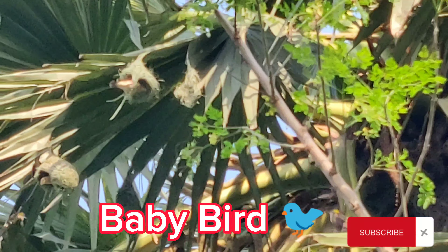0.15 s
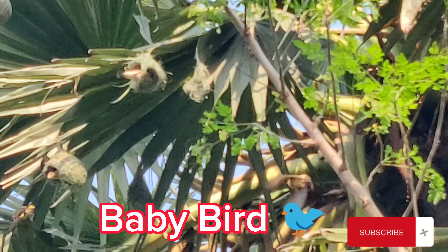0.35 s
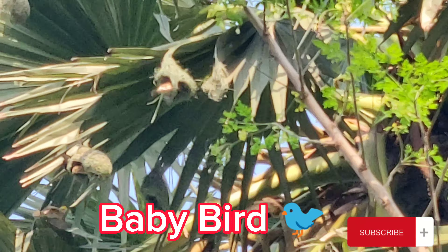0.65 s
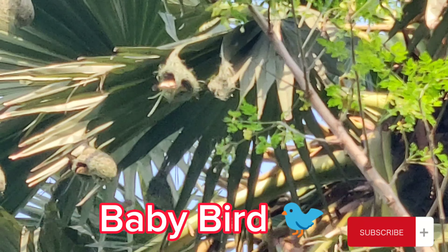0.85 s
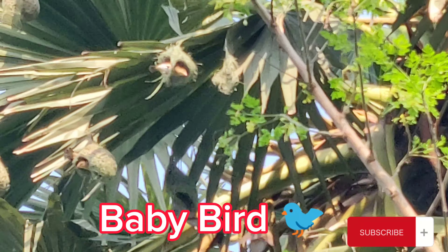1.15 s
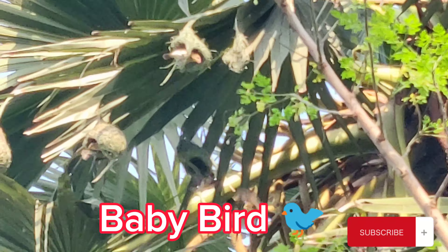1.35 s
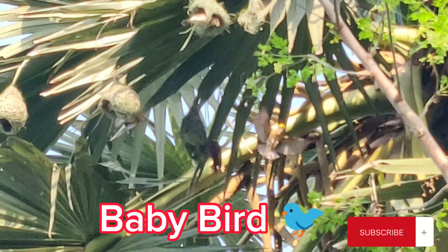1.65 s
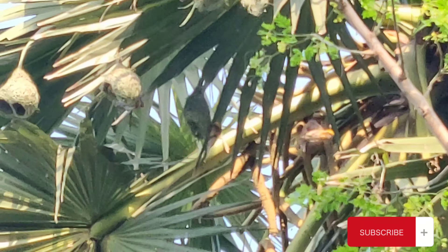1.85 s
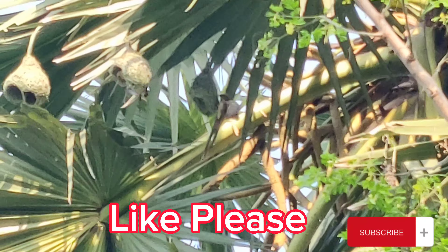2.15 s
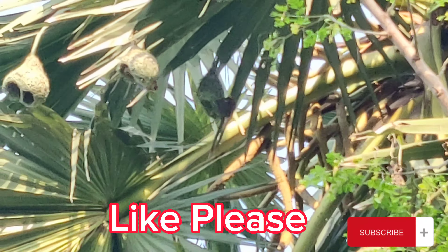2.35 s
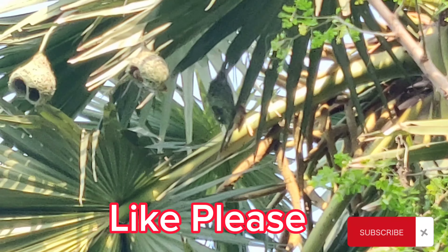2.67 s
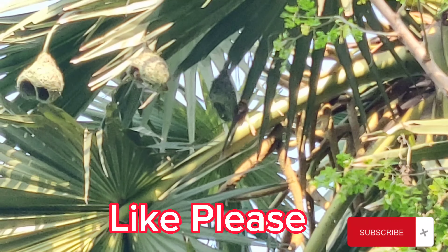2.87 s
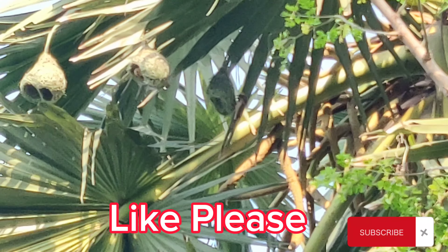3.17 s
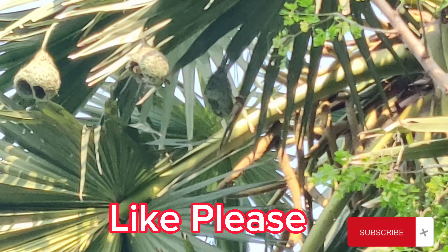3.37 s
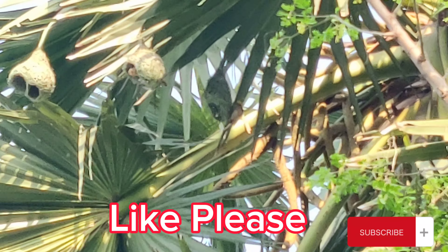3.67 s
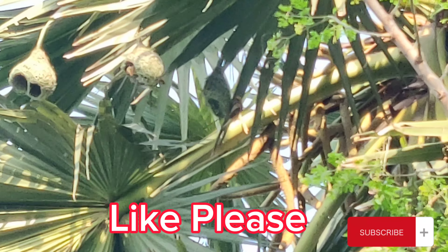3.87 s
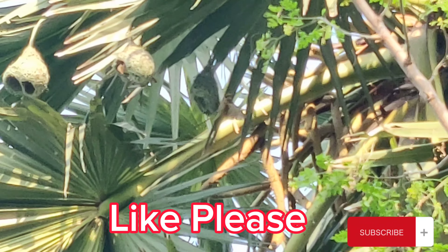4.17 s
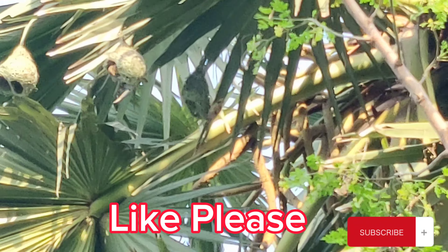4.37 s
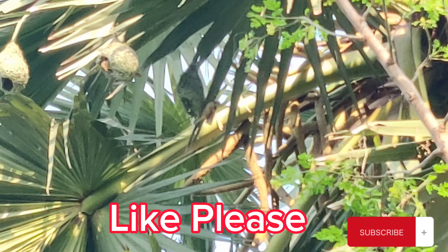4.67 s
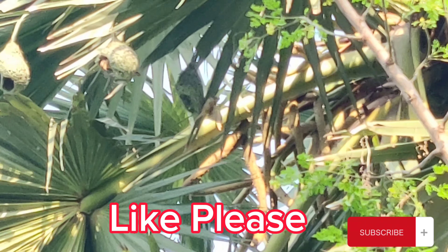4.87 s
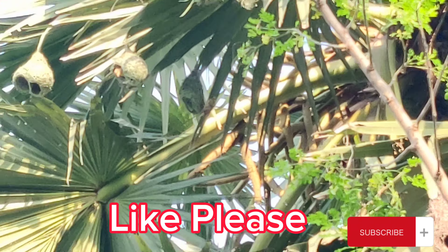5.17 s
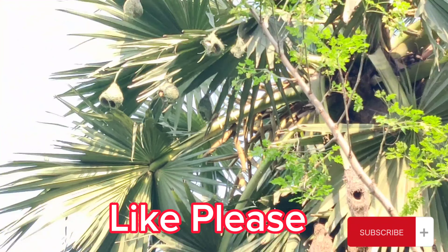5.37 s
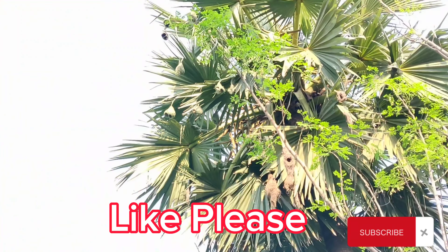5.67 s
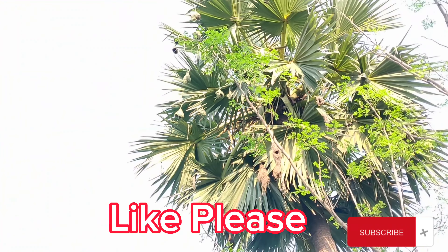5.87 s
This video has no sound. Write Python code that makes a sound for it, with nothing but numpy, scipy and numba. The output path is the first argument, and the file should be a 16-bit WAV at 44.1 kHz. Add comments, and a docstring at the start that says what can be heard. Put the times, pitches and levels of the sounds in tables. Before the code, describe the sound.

A colony of weaver birds chatters in raspy bursts with sharp chirps and a long wheezing buzz, over low outdoor rumble and distant cooing.

```python
"""A weaver colony in a fan palm, over a low outdoor rumble with a bird cooing far off from the start.
Rasping chatter, two sides of a syrinx pulsing through throat resonances, soon gains sharp gliding chirps.
Soft filtered-noise knocks begin close to the microphone, then come a thin sliding whistle and a long wheezing
buzz, a pulsed high tone over a lower one. Two pairs of squeaky clicks follow, tone plus hiss, as the calls thin out.
The stiff fronds scatter every call."""
import sys
import numpy as np
from scipy import signal
from scipy.fft import rfft, irfft, next_fast_len
from scipy.io import wavfile
from numba import njit

SR = 44100
rng = np.random.default_rng(int(sys.argv[2]) if len(sys.argv) > 2 else 0)


def generate_wav(sig):
    """Save sig (samples, or channels by samples) to the path in sys.argv[1] as 16-bit PCM at SR."""
    pcm = np.round(np.clip(np.atleast_2d(sig).T, -1, 1) * 32767).astype(np.int16)
    wavfile.write(sys.argv[1], SR, pcm)


N = 265482
TIME = np.arange(N) / SR  # seconds
LEFT_LAG = 7  # samples by which the palm's sound reaches the left ear late
TOP_HZ = 15500

# Outdoor air spectrum. Each row: frequency in Hz, relative density in dB per Hz.
AIR_SPECTRUM = [(15, -36.5), (25, 0.5), (75, -3), (140, -14), (389, -22.5), (582, -25.5), (722, -28),
                (1410, -34.5), (2920, -36.5), (3630, -36), (4750, -34), (6050, -34.5), (7500, -30),
                (9810, -51.5), (15500, -44.5)]
AIR_DB, AIR_WANDER_DB = -49, 0.8
MURMUR_DB, MURMUR_DB_PER_S, MURMUR_WANDER_DB = -60.5, -1.32, 0.7  # the low murmur slowly fades

# Soft knocks. Each row: start in seconds, level in dB before the knock gain, upper edge in Hz,
# left minus right in dB.
KNOCKS = [(1.823, -37.5, 806, 19), (1.851, -31.5, 1500, 23), (1.914, -36.5, 694, 29),
          (2.185, -41.5, 890, 16), (2.683, -47.5, 605, 18), (3.401, -41, 610, 23), (3.569, -39.5, 880, 0.5),
          (4.047, -42.5, 483, 29), (4.368, -37.5, 1040, 0)]
KNOCK_GAIN_DB = 8.5
KNOCK_DECAY_S, KNOCK_EDGE_HZ = 0.0062, 1020  # scrape decay at this edge; brighter ones die faster

# Distant coos. Each row: start in seconds, length in seconds, top pitch in Hz, level in dB.
COOS = [(0.085, 0.227, 757, -49.5), (0.04, 0.5, 636, -55.5), (1.156, 0.65, 621, -57),
        (1.237, 0.35, 696, -60), (2.081, 0.6, 628.7, -54.5), (2.164, 0.22, 711, -55.5),
        (2.939, 0.5, 625, -55), (3.09, 0.34, 702, -59)]
# Pitch arch of a coo. Each entry: pitch as a share of the top, at the start, the top and the end.
COO_ARCH = [0.94, 1, 0.925]

# Squeaky clicks. Each row: start in seconds, length in seconds, start pitch in Hz, end pitch in Hz, level in dB.
SQUEAKS = [(3.567, 0.0039, 1195, 1810, -25.5), (3.586, 0.015, 1400, 1225, -31),
           (4.3723, 0.0073, 1410, 1860, -24), (4.419, 0.015, 1346, 1243, -29.5)]
# Overtones of a squeak, from the second harmonic up. Each entry: level in dB re the fundamental.
SQUEAK_OVERTONES = [-7.5, -8.5, -8, -8, -28, -50]
# Hiss spectrum of a squeak. Each row: frequency in Hz, response in dB.
SQUEAK_HISS = [(1000, -15.5), (3000, -12), (6800, 2), (8500, -2.5), (10500, -36), (15000, -35)]
SQUEAK_BRIGHT_DB, SQUEAK_HISS_DB = 0, 0.5  # overtone and hiss gains

# Slurred whistled notes. Each row: start in seconds, length in seconds, start pitch in Hz, end pitch in Hz,
# level in dB, opening accent in dB.
WHISTLES = [(2.003, 0.017, 3260, 3280, -35, 2), (2.022, 0.12, 3462, 3412, -37.5, 17),
            (2.13, 0.195, 3462, 3608, -39, 1.5), (2.331, 0.115, 3250, 3496, -36, 8.5)]
WHISTLE_ATTACK_S, WHISTLE_RELEASE_S, ACCENT_S = 0.006, 0.007, 0.039
WHISTLE_PAN_DB = -15.5  # left minus right

# Sharp falling pips of a bird on the left. Each row: start in seconds, middle pitch in Hz,
# level in dB before the chirp gain.
PIPS = [(0.954, 5600, -28), (1.134, 5750, -15.5), (1.144, 5760, -21), (1.164, 6330, -16),
        (1.269, 5550, -18.5), (1.409, 5530, -16.5), (1.566, 5675, -17.5), (1.59, 5870, -18),
        (1.726, 5610, -15.5), (1.861, 5370, -20), (2.066, 5400, -28.5), (2.222, 5330, -26),
        (2.442, 5300, -25)]
PIP_S, PIP_FALL, PIP_PAN_DB = 0.0078, 0.08, 10  # length, fall as a share of the pitch, left minus right
# Longer chirps of the other birds. Each row: start in seconds, length in seconds, start pitch in Hz,
# end pitch in Hz, level in dB before the chirp gain, left minus right in dB.
CHIRPS = [ (0.839, 0.054, 4420, 4000, -30.5, -11), (1.05, 0.011, 4300, 3150, -40, -13),
          (1.136, 0.028, 7700, 7270, -24, -6), (1.272, 0.058, 7900, 6340, -24, -4),
          (1.304, 0.036, 3910, 4360, -21, -12), (1.531, 0.04, 6580, 6120, -24.5, 3.5),
          (1.758, 0.024, 4250, 4090, -24, -10), (1.961, 0.047, 3900, 3690, -43, -22),
          (2.568, 0.014, 4630, 2970, -23.5, -7), (2.577, 0.022, 3130, 3060, -24, -11),
          (2.592, 0.055, 5950, 5700, -31.5, 3), (2.776, 0.052, 7700, 7000, -31, -10.5),
          (3.144, 0.088, 1325, 1700, -48, 9), (4.258, 0.038, 6220, 5530, -49.5, 3),
          (5.777, 0.055, 4060, 3420, -50.5, -11), (5.778, 0.068, 7800, 6640, -46.5, -11)]
# Octave level of the chirps: weaker the higher it lies. Each row: octave frequency in Hz,
# level in dB re the fundamental.
CHIRP_OCTAVE = [(8000, -19.5), (11000, -51)]

BUZZ_START_S, BUZZ_LENGTH_S, BUZZ_ATTACK_S, BUZZ_RELEASE_S = 2.61, 0.792, 0.035, 0.012
BUZZ_PULSE_HZ, BUZZ_LOWER_HZ = 234, 4120
BUZZ_UPPER_DB, BUZZ_LOWER_GAIN_DB = -28, 5.5
# Pitch of the upper buzzing voice. Each row: time in seconds, pitch in Hz.
BUZZ_PITCH = [(2.63, 5220), (2.752, 5058), (3.184, 5433), (3.41, 5237)]
# Loudness of the lower buzzing voice. Each row: time in seconds, level in dB before the lower gain.
BUZZ_LOWER_LEVEL = [(2.63, -45), (2.796, -51), (2.82, -43), (2.84, -43), (2.964, -34), (3.326, -41.5),
                    (3.362, -33.5), (3.41, -41)]

# Rasps, some overlapping. Each row: start in seconds, length in seconds, level in dB, swell over the call in dB,
# main resonance in Hz, low resonance in Hz, then the low resonance, the high resonance and the rattle,
# each in dB before its gain in the mix.
RASPS = [ (0.125, 0.028, -56.5, -4, 5900, 3240, 0.5, -1.5, -9.5),
         (0.231, 0.15, -47.5, -0.5, 6310, 3450, -5.5, -2, -16),
         (0.422, 0.096, -38.5, 10.5, 6040, 2720, -8, -12, -33),
         (0.645, 0.021, -53.5, 1, 5870, 3430, 0, 4.5, -18),
         (0.714, 0.1, -33, 6, 5800, 3700, -10, -7.5, -27),
         (0.823, 0.09, -41, 9, 6030, 3200, -0.5, -7.5, -22),
         (0.922, 0.042, -34.5, 6, 5640, 3040, -8.5, -11, -38),
         (1.053, 0.36, -34.5, 2, 5890, 3340, -4.5, -9, -42),
         (1.115, 0.077, -33, 1, 6270, 3970, -2, -5.5, -48), (1.273, 0.042, -33, 5, 6080, 3890, -2, -9, -27),
         (1.51, 0.4, -38.5, -2.5, 5780, 3410, 0, -8, -38),
         (1.545, 0.057, -33, 7.5, 5800, 3750, -10, -8, -29.5),
         (1.821, 0.057, -34.5, 3, 5540, 3400, -11.5, -12, -24.5),
         (1.981, 0.1, -44.5, 4.5, 5700, 3150, 0.5, -5, -25.5),
         (2.157, 0.085, -42, 5, 5680, 3580, -1, -5, -25),
         (2.284, 0.16, -37.5, -2.5, 5900, 3630, -8, -13, -29.5),
         (2.433, 0.091, -32, -0.5, 5880, 3920, -11, -13.5, -33),
         (2.62, 0.1, -32, 6.5, 5780, 3900, -7, -10.5, -34.5),
         (2.723, 0.691, -34.5, -1, 5490, 4040, -6.5, -13, -37.5),
         (3.136, 0.084, -34.5, 5.5, 5470, 4420, -7, -5, -41),
         (3.493, 0.089, -43.5, 1.5, 5400, 3070, 4.5, -9.5, -18),
         (3.864, 0.023, -50, 1.5, 6050, 3580, -0.5, 5.5, -16),
         (4.929, 0.017, -55.5, -3, 5700, 4050, 7, 4, -23),
         (5.077, 0.019, -50.5, -6, 5620, 4160, 3, 5.5, -22),
         (5.202, 0.12, -42.5, -1, 6030, 3580, -5, -10, -30.5),
         (5.52, 0.12, -43, 1, 6400, 3470, -7, -12, -33)]
RASP_ATTACK_S, RASP_RELEASE_S = 0.011, 0.014
RASP_ARCH_DB, RASP_FLUTTER_DB = 2, 1.0  # a rasp bulges in its middle, and is uneven throughout
MAIN_WIDTH_HZ = 2220
# Throat and beak response around the low resonance. Each row: frequency in Hz, response in dB.
THROAT_LOW = [(1200, -35), (2300, -6), (2900, -3), (4600, -7), (5600, -9), (8000, -43.5)]
# Throat and beak response around the main resonance. Each row: frequency in Hz, response in dB.
THROAT_MAIN = [(2500, -24), (4600, 6.5), (6600, 4), (7300, -2), (9000, -30)]
# Throat and beak response of the high resonance. Each row: frequency in Hz, response in dB.
THROAT_HIGH = [(5800, -20), (6900, -5), (7800, -1.5), (8700, -3.5), (9400, -16), (10300, -52),
               (15000, -24.5)]
# Throat response to the low rattle. Each row: frequency in Hz, response in dB.
THROAT_RATTLE = [(900, -22.5), (1450, -3.5), (2000, 3.5), (2700, 6), (3800, -50)]
# Stereo balance of the rasps. Each row: frequency in Hz, left minus right in dB before the overall pan.
RASP_BALANCE = [(60, 2.5), (110, -4.5), (200, -4.5), (380, -2.5), (700, 1), (1290, 6), (2380, -4.5),
                (4400, 1.5), (8120, -7), (15000, 0)]
RASP_PAN_DB = 0.8  # left minus right, on top of the balance


def undb(db):
    """Decibels to gain."""
    return 10 ** (np.asarray(db) / 20)


def unit(x):
    """Scale to rms 1."""
    return x / np.sqrt(np.mean(x ** 2) + 1e-18)


def colour(x, points):
    """Filter by a (Hz, dB) response, drawn straight between its points over log frequency."""
    hz, db = np.transpose(points)
    size = next_fast_len(x.shape[-1] + 2048)
    f = np.maximum(np.arange(size // 2 + 1) * SR / size, 1)
    gain = undb(np.interp(np.log(f), np.log(hz), db))
    return irfft(rfft(x, size) * gain, size)[..., :x.shape[-1]]


def walk(rate):
    """Random wander of rms 1, gliding between this many fresh values a second."""
    return unit(np.interp(TIME * rate, np.arange(N), rng.standard_normal(N)))


def turn(hz):
    """Phase in radians of a moving frequency."""
    return 2 * np.pi * np.cumsum(hz) / SR


def pan(db):
    """Left and right gains of a level difference, at constant power."""
    gains = undb(np.array([[1], [-1]]) * db / 2)
    return gains / np.sqrt(np.mean(gains ** 2, axis=0))


def add(out, s, sound):
    """Mix a sound in at a time in seconds."""
    i = max(int(s * SR), 0)
    out[:, i:i + sound.shape[-1]] += sound[..., :N - i]


def envelope(t, length, attack_s, release_s):
    """Attack, hold and release of one call."""
    return np.clip(t / attack_s, 0, 1) * np.exp(-np.maximum(t - length, 0) / release_s)


def fronds(x, near_db, near_s, tail_db, tail_t60=0.76, lag=LEFT_LAG):
    """Direct sound, quick reflections off the fronds and a tail from the trees around; each ear has its own."""
    t = np.arange(SR // 2) / SR
    # cubing the noise leaves a few strong reflections among many weak ones
    facets = rng.standard_normal((2, len(t))) ** 3 * np.exp(-t / near_s) * (t > 0.0005)
    trees = rng.standard_normal((2, len(t))) * undb(-60 * t / tail_t60) * np.minimum(t / 0.022, 1)
    facets /= np.linalg.norm(facets, axis=1, keepdims=True)
    trees /= np.linalg.norm(trees, axis=1, keepdims=True)
    echo = undb(near_db) * facets + undb(tail_db) * trees
    echo[[0, 1], [lag, 0]] += 1  # direct sound
    echo /= np.linalg.norm(echo, axis=1, keepdims=True)
    return signal.fftconvolve(x * np.ones((2, 1)), echo, axes=1)[:, :N]


def air(side_db=-9.0):
    """Low outdoor rumble, much alike at both ears, under a wide faint hiss of leaves, with a fading murmur."""
    mid = unit(colour(rng.standard_normal(N), AIR_SPECTRUM))
    side = unit(colour(rng.standard_normal(N), AIR_SPECTRUM))
    side = colour(side, [(60, side_db), (700, -5), (3000, -0.5), (9000, -0.5)])
    bed = (mid + side * np.array([[1], [-1]])) * undb(AIR_DB + AIR_WANDER_DB * walk(4.1))
    murmur_response = [(40, -15.0), (150, 0.0), (450, -9.5), (900, -6.0), (2000, -12), (6000, -35.5)]
    murmur = unit(colour(rng.standard_normal((2, N)), murmur_response))
    murmur_db = MURMUR_DB + MURMUR_DB_PER_S * TIME + MURMUR_WANDER_DB * walk(9.5)
    return bed * pan(1.5) + murmur * undb(murmur_db)


def coos():
    """A far bird's arched, nearly pure notes, blurred by distance."""
    out = np.zeros((2, N))
    waver_hz = 9 * walk(50)
    for s, length, top_hz, db in COOS:
        u = np.linspace(0, 1, int(length * SR))
        hz = top_hz * np.interp(u, [0, 0.4, 1], COO_ARCH) + waver_hz[int(s * SR):][:len(u)]
        add(out, s, np.sin(turn(hz)) * np.abs(np.sin(np.pi * u)) ** .5 * undb(db))
    return fronds(out * undb(walk(25)), near_db=-10, near_s=0.03, tail_db=-6, tail_t60=0.8)


def knocks(grit=0.36):
    """Dull taps close to the microphone: a short push with a little scrape in it, band-passed."""
    out = np.zeros((2, N))
    t = np.arange(SR // 16) / SR
    for s, db, edge_hz, pan_db in KNOCKS:
        scrape_decay = np.exp(-t / KNOCK_DECAY_S * (edge_hz / KNOCK_EDGE_HZ) ** 2)
        push = np.exp(-t * edge_hz * 2) + grit * rng.standard_normal(len(t)) * scrape_decay
        body = signal.sosfilt(signal.butter(2, [70, edge_hz], "band", fs=SR, output="sos"), push)
        add(out, s, body / np.abs(body).max() * undb(db + KNOCK_GAIN_DB) * pan(pan_db))
    return fronds(out, near_db=-11, near_s=0.01, tail_db=-20, lag=0)


def squeaks(hiss_s=0.013):
    """Close clicks in pairs: a quick upward squeak, then a falling ring; the treble carries back most."""
    body, edge = np.zeros((2, 2, N))
    t = np.arange(SR // 8) / SR
    for s, length, start_hz, end_hz, db in SQUEAKS:
        u = np.linspace(0, 1, int(length * SR))
        phase = turn(start_hz + (end_hz - start_hz) * u)
        shape = np.minimum(u * 8, 1) * (1 - u) ** .5 * undb(db)
        overtones = sum(undb(d) * np.sin(k * phase) for k, d in enumerate(SQUEAK_OVERTONES, 2))
        hiss = unit(colour(rng.standard_normal((2, len(t))), SQUEAK_HISS))
        hiss = hiss * np.minimum(t / 0.005, 1) * np.exp(-t / hiss_s)
        add(body, s, shape * np.sin(phase))
        add(edge, s, shape * overtones * undb(SQUEAK_BRIGHT_DB))
        add(edge, s, hiss * undb(db + SQUEAK_HISS_DB))
    body = fronds(body, near_db=-16, near_s=0.02, tail_db=-20, tail_t60=0.3, lag=0)
    return body + fronds(edge, near_db=-6.5, near_s=0.02, tail_db=-11, tail_t60=0.44, lag=0)


def whistle(octave_db=-24, flutter_db=2.0, waver=0.0052):
    """Thin notes from the right: each opens with an accent and slides to its pitch, fluttering as it goes."""
    out, drift = np.zeros((1, N)), 1 + waver * walk(150)
    for s, length, start_hz, end_hz, db, accent_db in WHISTLES:
        t = np.arange(int(length * SR) + SR // 16) / SR
        hz = end_hz + (start_hz - end_hz) * np.maximum(1 - t / length, 0) ** 2
        phase = turn(hz * drift[int(s * SR):][:len(t)])
        level = undb(db + accent_db * np.exp(-(t / ACCENT_S) ** 2 / 2))
        gain = envelope(t, length, WHISTLE_ATTACK_S, WHISTLE_RELEASE_S) * level
        add(out, s, np.sqrt(2) * gain * (np.sin(phase) + undb(octave_db) * np.sin(2 * phase)))
    heard = fronds(out * undb(flutter_db * walk(70)), near_db=-8, near_s=0.015, tail_db=-16, lag=0)
    return heard * pan(WHISTLE_PAN_DB)


def glide(length, start_hz, end_hz, waver):
    """A tone that moves fast at first and then settles, with a weak octave."""
    u = np.linspace(0, 1, int(length * SR))
    hz = (end_hz + (start_hz - end_hz) * (1 - u) ** 1.454) * (1 + waver[:len(u)])
    octave = undb(np.interp(2 * end_hz, *np.transpose(CHIRP_OCTAVE)))
    return (np.sin(turn(hz)) + octave * np.sin(2 * turn(hz))) * np.sin(np.pi * u)


def chirps(gain_db=1.5):
    """Pips and longer chirps from around the nests, each a wavering glide in pitch."""
    out, waver = np.zeros((2, N)), 0.019 * walk(900)
    pips = [(s, PIP_S, hz * (1 + PIP_FALL / 2), hz * (1 - PIP_FALL / 2), db, PIP_PAN_DB) for s, hz, db in PIPS]
    for s, length, start_hz, end_hz, db, pan_db in pips + CHIRPS:
        tone = glide(length, start_hz, end_hz, waver[int(s * SR):])
        add(out, s, tone * undb(db + gain_db) * pan(pan_db))
    return fronds(out, near_db=-2, near_s=0.012, tail_db=-16)


def buzz(depth=0.8, swing_hz=150):
    """The long wheeze: one side of the syrinx pulses a high tone while the other holds a lower, cleaner one."""
    gate = envelope(TIME - BUZZ_START_S, BUZZ_LENGTH_S, BUZZ_ATTACK_S, BUZZ_RELEASE_S)
    upper_hz = np.interp(TIME, *np.transpose(BUZZ_PITCH))
    lower_db = np.interp(TIME, *np.transpose(BUZZ_LOWER_LEVEL))
    beat = turn(BUZZ_PULSE_HZ * (1 + 0.02 * walk(40)))
    quiver_hz = 21 * walk(350)
    # each pulse glides down in pitch and jumps back up, which spreads a stack of side tones
    snap = np.sin(beat) + np.sin(2 * beat) / 2 + np.sin(3 * beat) / 3
    upper = (1 + depth * np.cos(beat)) * np.sin(turn(upper_hz + swing_hz * snap + quiver_hz))
    lower_pulse = 1 + 0.2 * np.cos(beat) + 0.3 * np.cos(2 * beat)
    lower = lower_pulse * np.sin(turn(BUZZ_LOWER_HZ + quiver_hz))
    upper = gate * unit(upper) * undb(BUZZ_UPPER_DB + 1.2 * walk(70))
    lower = gate * unit(lower) * undb(BUZZ_LOWER_GAIN_DB + lower_db + 1.7 * walk(160))
    high = fronds(upper, near_db=-4, near_s=0.014, tail_db=-15)
    low = fronds(lower, near_db=-7, near_s=0.012, tail_db=-25)
    return high * pan(8.2) + low * pan(0.6)


@njit
def moving_bandpass(x, hz, width):
    """State-variable band-pass whose centre and width in Hz may move."""
    y, band, low = np.empty(len(x)), 0., 0.
    for i in range(len(x)):
        g, damping = np.tan(np.pi * hz[i] / SR), width[i] / hz[i]
        v = (band + g * (x[i] - low)) / (1 + g * (g + damping))
        band, low, y[i] = 2 * v - band, low + 2 * g * v, damping * v
    return y


def resonate(x, hz, width):
    """A steep moving resonance, two band-passes deep, levelled to pass the same power at any width."""
    return moving_bandpass(moving_bandpass(x, hz, width), hz, width) / np.sqrt(width)


def sweeps(rate_hz, top_hz, bottom_hz, rough):
    """One side of the syrinx: a fast uneven train of pulses, each a tone that dives in pitch."""
    cycle = np.cumsum(rate_hz * np.exp(0.2 * walk(110))) / SR % 1
    jitter = np.exp(0.09 * walk(160) + rough * walk(2500))
    hz = top_hz * (bottom_hz / top_hz) ** cycle * jitter
    return np.sin(np.pi * cycle) ** .5 * np.sin(turn(hz)) * undb(1.3 * walk(120))


def rasping():
    """Effort of all rasps together, and the throat setting, averaged over the rasps by their power."""
    # a tiny floor holds the throat at its average between calls
    mix = np.outer([1, *np.mean(RASPS, axis=0)[4:]], np.full(N, 1e-14))
    for s, length, db, swell_db, *throat in RASPS:
        t = np.arange(int(length * SR) + SR // 8) / SR
        u = np.minimum(t / length, 1)
        shape_db = swell_db * (u - .5) + RASP_ARCH_DB * (np.sin(np.pi * u) - .5)
        effort = envelope(t, length, RASP_ATTACK_S, RASP_RELEASE_S) * undb(db + shape_db)
        add(mix, s, np.outer([1, *throat], effort ** 2))
    return np.sqrt(mix[0]) * undb(RASP_FLUTTER_DB * walk(45)), mix[1:] / mix[0]


def chatter():
    """Both sides of the syrinx rasp at once, with some hiss, through the resonances of throat and beak."""
    effort, (main_hz, low_hz, low_db, high_db, rattle_db) = rasping()
    upper = sweeps(rate_hz=104, top_hz=8410, bottom_hz=4326, rough=0.04)
    lower = sweeps(rate_hz=125, top_hz=5800, bottom_hz=2900, rough=0.09)
    voice = unit(upper + 0.8 * lower) + undb(-3) * rng.standard_normal(N)
    main = resonate(voice, main_hz, np.full(N, 1. * MAIN_WIDTH_HZ))
    main = unit(colour(main, THROAT_MAIN)) * undb(3.0)
    low = unit(colour(resonate(voice, low_hz, 0.52 * low_hz), THROAT_LOW)) * undb(low_db + 3.5)
    high = unit(colour(voice, THROAT_HIGH)) * undb(high_db + 2.5)
    rattle = unit(colour(voice * np.abs(lower), THROAT_RATTLE)) * undb(rattle_db + 13.0)
    # neighbouring resonances swing in opposite senses, so the valley between them stays filled
    call = effort * (main - low + high + rattle)
    heard = fronds(call, near_db=4, near_s=0.008, tail_db=-10)
    hz, balance_db = np.transpose(RASP_BALANCE)
    ear_gains = pan(balance_db + RASP_PAN_DB)
    return np.array([colour(ear, np.c_[hz, 20 * np.log10(gain)]) for ear, gain in zip(heard, ear_gains)])


def scene():
    """The colony and all around it."""
    return air() + coos() + knocks() + squeaks() + whistle() + chirps() + buzz() + chatter()


def record(dry):
    """A steep elliptic low-pass cuts the top."""
    return signal.sosfilt(signal.ellip(10, .2, 80, TOP_HZ, fs=SR, output="sos"), dry)


dry = scene()
out = record(dry)
generate_wav(out)
```